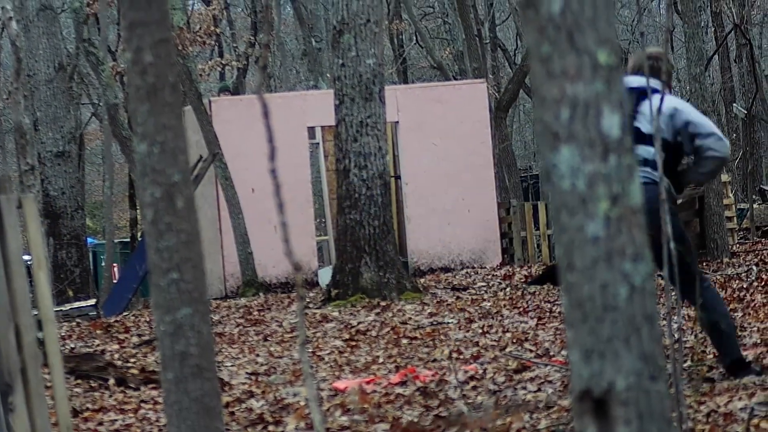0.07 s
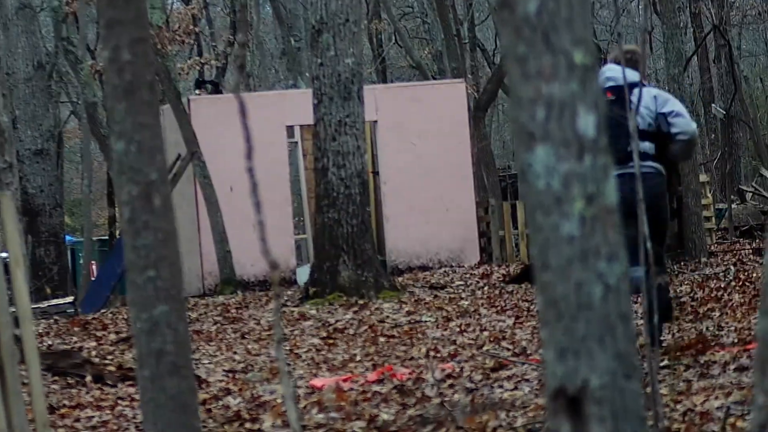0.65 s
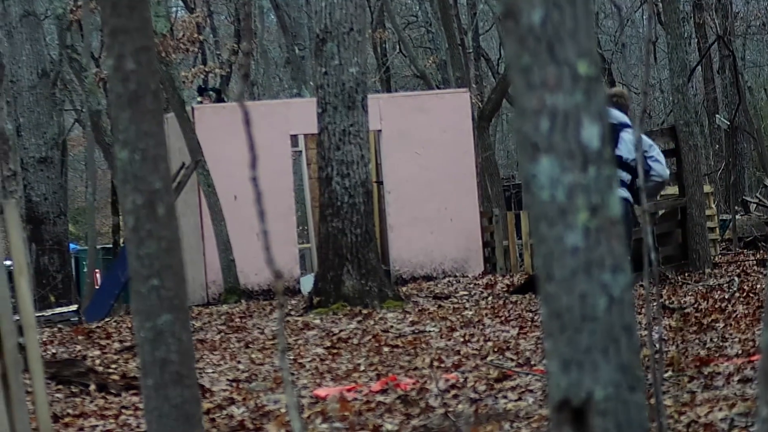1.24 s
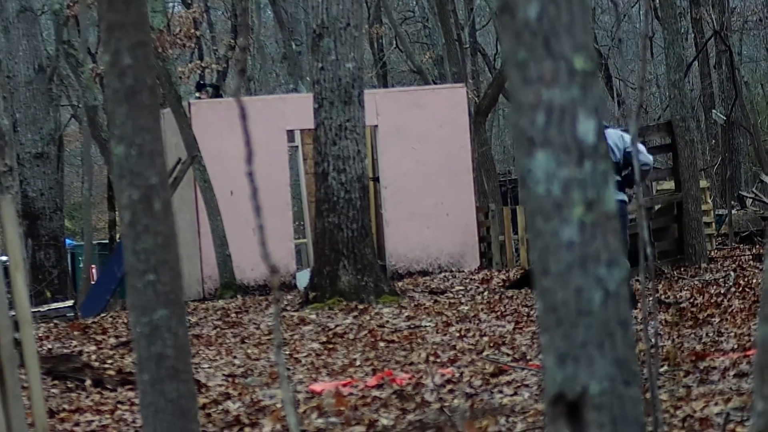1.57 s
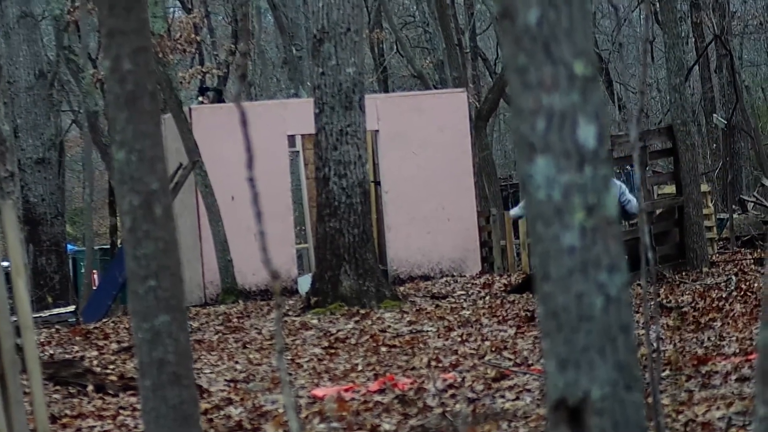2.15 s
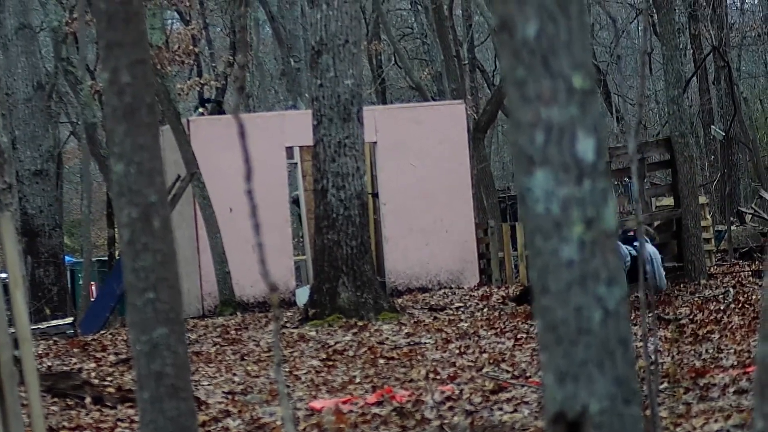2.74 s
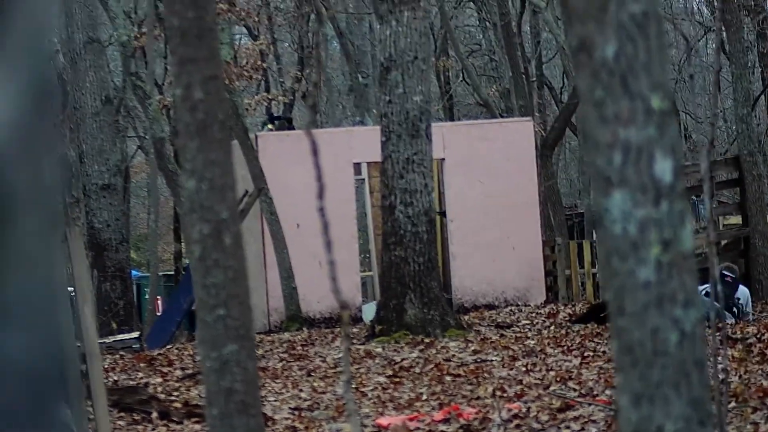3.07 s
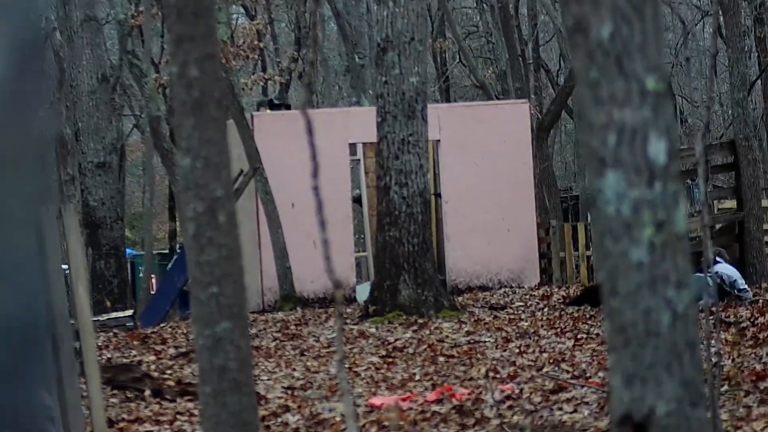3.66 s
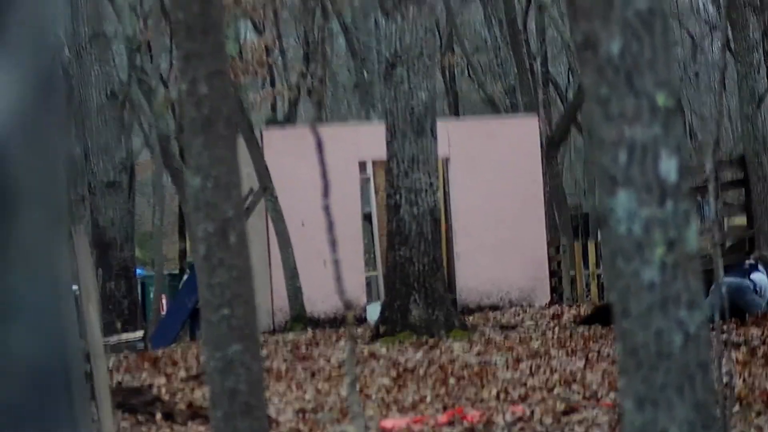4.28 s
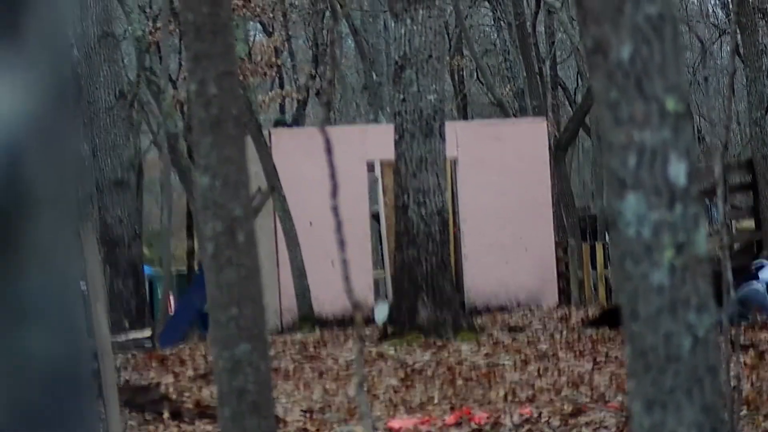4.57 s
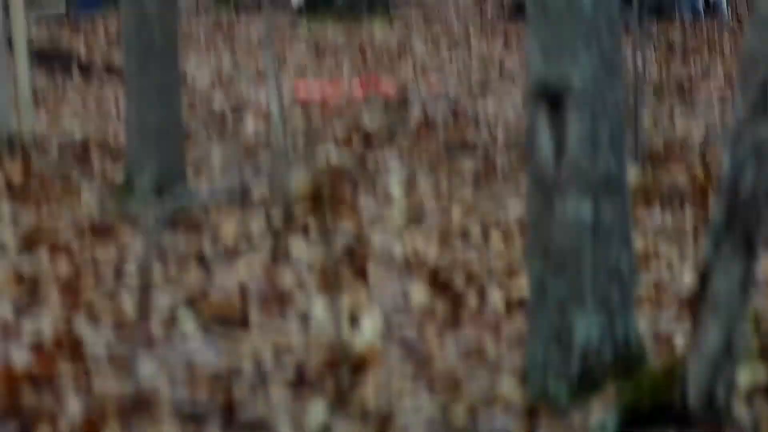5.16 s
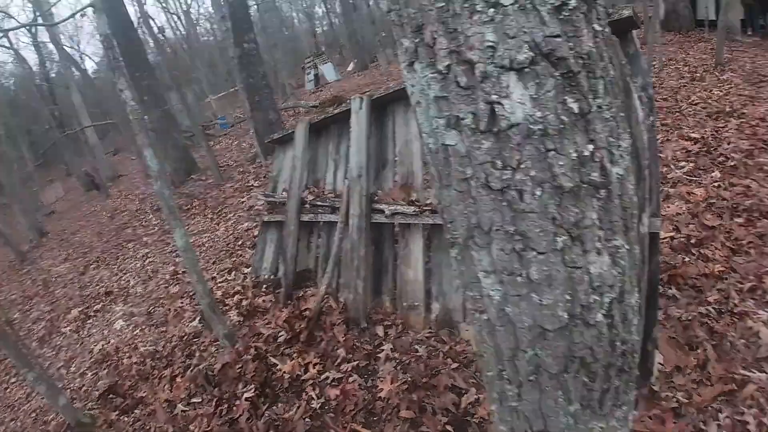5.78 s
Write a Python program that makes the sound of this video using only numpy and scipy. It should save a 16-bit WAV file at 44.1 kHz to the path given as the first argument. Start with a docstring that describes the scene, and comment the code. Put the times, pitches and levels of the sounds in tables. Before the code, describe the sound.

In a quiet wood, an electric airsoft rifle fires right at the microphone. Eight quick shots come first, then a brief pause and six more. Each is a short gear whirr ending in a hard clack and a hollow thud. The electric magazine winds and clicks faintly alongside, and the trigger springs back between shots. Afterwards hands bump the gun, a sleeve brushes it and a few faint ticks sound.

```python
"""A wood, with the microphone close on the body of an electric airsoft rifle: fourteen shots in two strings.
For each shot the motor whirrs up through the gears, the piston slams home and rings the gearbox,
the gun shudders and the trigger springs back. An electric magazine winds and clicks beside it.
Afterwards hands shift the gun, a sleeve brushes it and a few faint ticks sound in the still air."""
import sys
import numpy as np
from scipy import signal
from scipy.fft import rfft, irfft
from scipy.io import wavfile

SR = 44100
rng = np.random.default_rng(int(sys.argv[2]) if len(sys.argv) > 2 else 0)


def dump(signal):
    """Clip the signal to [-1, 1] and save it as 16-bit WAV at the path in sys.argv[1]."""
    limited = np.clip(np.atleast_2d(signal).T, -1, 1)
    pcm = np.round(limited * 32767).astype(np.int16)
    wavfile.write(sys.argv[1], SR, pcm)


N = 260895
TIME = np.arange(N) / SR


def from_db(db):
    return 10 ** (np.asarray(db) / 20)


def ramp(t, length):
    """From 0 at t = 0 up to 1 at t = length."""
    return np.clip(t / length, 0, 1)


def swell(middle_s, length_s):
    """A smooth rise and fall, as gain."""
    return np.sin(np.pi * ramp(TIME - middle_s + length_s / 2, length_s))


def add(track, start_s, sound):
    """Mix a sound into a track."""
    start = max(round(start_s * SR), 0)
    track[start:start + len(sound)] += sound[:max(N - start, 0)]


def flutter(rate_hz, size):
    """A smooth random wander with an RMS of 1."""
    lowpass = signal.butter(2, rate_hz, fs=SR, output="sos")
    wander = signal.sosfilt(lowpass, rng.standard_normal(size + SR // 10))[-size:]
    return wander / np.sqrt(np.mean(wander ** 2) + 1e-20)


def colour(x, spectrum, resonances=(), size=8192):
    """Minimum-phase filter of unit power: a broad slope lifted by ringing resonances."""
    hz = np.maximum(np.arange(size // 2 + 1) * SR / size, 1)
    knots, levels = np.transpose(spectrum)
    db = np.interp(np.log(hz), np.log(knots), levels)
    db += sum(lift / (1 + (2 * (hz - centre) / width) ** 2) for centre, width, lift in resonances)
    cepstrum = irfft(np.log(from_db(db)))[:size // 2]
    cepstrum[1:] *= 2
    response = irfft(np.exp(rfft(cepstrum, size)))
    return signal.oaconvolve(x, response / np.linalg.norm(response))[:N]


def bursts(contacts, rise_s):
    """Each contact (start_s, level_db, t60_s) is a dying cluster of tiny impacts."""
    out, t = np.zeros(N), TIME[:SR // 5]
    for s, db, t60 in contacts:
        envelope = from_db(db - 60 * t / t60) * (1 - np.exp(-t / rise_s))
        add(out, s, envelope * rng.choice([-1, 1], len(t)))
    return out


def mode(blows, hz, t60_s, rise_s):
    """One mode rung by soft blows (start_s, level_db)."""
    out, t = np.zeros(N), TIME[:SR]
    ring = np.sin(2 * np.pi * hz * t) * from_db(-60 * t / t60_s) * (1 - np.exp(-(t / rise_s) ** 2))
    for s, db in blows:
        add(out, s, from_db(db) * ring)
    return out


# The background of the wood: frequency_hz, level_db
AIR_COLOUR = [(240, -22), (400, -41), (558, -14), (660, -23), (1820, 7.5), (2510, -26.5), (4010, -4),
              (4740, 12.5), (5350, -11), (5860, 6), (15000, -68)]

def still_air():
    """A steady, faint hiss lies behind the gun."""
    return from_db(-66) * colour(rng.standard_normal(N), AIR_COLOUR)


# A faint whine before the first shot: pitch_ratio, level_db
FALLING_PARTIALS = [(1, -9), (1.41, -4.5), (1.569, -7.5)]

def falling_whine(start_hz=820, fall_hz_per_s=362, end_s=0.49, fade_s=0.13):
    """Three partials slide down together and fade."""
    phase = 2 * np.pi * np.cumsum(start_hz - fall_hz_per_s * TIME) / SR
    tones = sum(from_db(db) * np.sin(ratio * phase) for ratio, db in FALLING_PARTIALS)
    return from_db(-56.5) * ramp(end_s - TIME, fade_s) * tones


# Ticks after the last shot: start_s, level_db
TICKS = [(5.1424, -35), (5.1981, -25.5), (5.3147, -25), (5.4306, -32), (5.557, -27.5), (5.8024, -28.5),
         (5.881, -27.5)]
# Their thin tone: frequency_hz, level_db
TICK_COLOUR = [(1000, -28), (3500, -10.5), (4500, 4.5), (6100, 5), (7200, -3), (9500, -16), (11000, -34),
               (15000, -40)]

def faint_ticks():
    """Short, high ticks with a sharp onset."""
    ticks = bursts([(s, db, 0.018) for s, db in TICKS], rise_s=0.00015)
    return from_db(-9.5) * colour(ticks, TICK_COLOUR)


# Hands shifting the gun at the microphone: middle_s, length_s, sway_db, hum_db
SHIFTS = [(.05, 0.49, -51, -72.5), (4.93, 0.19, -40.5, -52), (5.08, 0.33, -44, -50.5),
          (5.3, 0.48, -43, -53), (5.46, 0.25, -56, -52), (5.61, .18, -41.5, -66), (5.82, 0.31, -52, -51.5)]
# The gun's deep sway and the hum of its body: frequency_hz, level_db
SWAY_COLOUR = [(15, -12), (29, 0.5), (40, -19.5), (54, 6), (66, -7.5), (90, -23), (150, -29), (400, -71)]
HUM_COLOUR = [(60, -31), (130, -15), (195, -15.5), (225, 2.5), (265, -12), (315, -4), (400, -33.5),
              (520, -38), (680, -24), (900, -38.5), (3000, -77)]

def handling():
    """The gun sways and hums as the hands shift it, and as they steady it after each shot."""
    steadying = [(s + 0.088, 0.29, -43.5, -55.5) for s, *_ in SHOTS]   # columns as in SHIFTS
    sway, hum = from_db(-61), from_db(-75)   # hands at rest
    for middle_s, length_s, sway_db, hum_db in SHIFTS + steadying:
        move = swell(middle_s, length_s)
        sway = np.maximum(sway, from_db(sway_db) * move)
        hum = np.maximum(hum, from_db(hum_db) * move)
    return (sway * colour(rng.standard_normal(N), SWAY_COLOUR)
            + hum * colour(rng.standard_normal(N), HUM_COLOUR))


# A sleeve on the gun, close up: middle_s, length_s, level_db, resonance_hz
RUBS = [(4.945, 0.15, -52, 2360), (5.532, 0.28, -63.5, 3300), (5.588, 0.063, -62, 1710)]
# The tone of a touch on the gun: frequency_hz, level_db
RUB_COLOUR = [(400, -4), (700, -3), (1300, 0), (1900, 8), (2400, -5.5), (3100, 2.5), (4000, -15),
              (9000, -38), (11000, -47.5)]

def sleeve(width_hz=700, lift_db=14):
    """Cloth brushes along the gun in swells of friction noise."""
    out = np.zeros(N)
    for middle_s, length_s, db, hz in RUBS:
        friction = colour(rng.standard_normal(N), RUB_COLOUR, [(hz, width_hz, lift_db)])
        out += from_db(db) * swell(middle_s, length_s) * friction
    return out


# Modes of the gun's body, right by the microphone: pitch_hz, t60_s, level_db
BODY_MODES = [(222.4, 0.095, -24), (313.1, .1, -34), (664.6, 0.047, -30.5)]

def body(blows, delay_s, rise_s, upper_db, spread_db):
    """Blows (start_s, level_db) ring the body; upper_db shifts all modes but the lowest."""
    out = np.zeros(N)
    for k, (hz, t60_s, mode_db) in enumerate(BODY_MODES):
        gain_db = mode_db + upper_db * (k > 0)
        arrivals = [(s + delay_s, db + gain_db + spread_db * rng.standard_normal()) for s, db in blows]
        out += mode(arrivals, hz, t60_s, rise_s)
    return out


# Hand knocks after the firing: start_s, thud_db, click_db
BUMPS = [(4.875, 3.5, -36.5), (5.03, 1.5, -37.5), (5.067, -1, -55), (5.715, -0.5, -52)]

def hand_bumps():
    """A hand bumps the gun: a click, and a thud in the body."""
    blows = [(s, db) for s, db, _ in BUMPS]
    thuds = body(blows, delay_s=0, rise_s=0.0055, upper_db=-0.5, spread_db=2.5)
    clicks = bursts([(s, db, 0.03) for s, _, db in BUMPS], rise_s=0.00066)
    return from_db(-7) * thuds + colour(clicks, RUB_COLOUR)


# The magazine's ratchet, close by: start_s, level_db
RATCHET = [(0.3767, -25.5), (0.631, -30.5), (1.277, -31), (1.514, -30.5), (2.1064, -25), (2.361, -25.5),
           (2.637, -25), (2.7646, -25.5), (2.89, -23.5), (3.018, -22), (3.6195, -24), (3.865, -26)]
# Tones of the ratchet and the winder: frequency_hz, level_db
RATCHET_COLOUR = [(100, -8), (450, -12), (700, -11), (1200, 7), (1700, -14), (2700, -3), (4000, -10),
                  (6000, -3.5), (8000, -21.5), (9800, -11.5), (11000, -36), (14000, -48), (15500, -46)]
WINDER_COLOUR = [(100, -13.5), (450, -15), (700, 5), (1200, 8), (1700, 2), (2700, -4.5), (4000, 0.5),
                 (6000, -6), (8000, -12), (9800, -8), (11000, -19.5), (14000, -35), (15500, -45)]
# Resonances of the magazine's box: centre_hz, width_hz, lift_db
MAGAZINE_BOX = [(1077, 140, 12.5), (1895, 240, 16.7), (2350, 96, 13), (3075, 110, 12.5), (3320, 690, 13.6),
                (5160, 1900, 13.4), (5880, 720, 8.2), (6200, 520, 7.3), (7700, 1200, 12),
                (8580, 1500, 14.1)]

def magazine(tighten_s=1.4, stop_s=3.97, fade_db_per_s=45, floor_db=-64.5):
    """The ratchet snaps over; the winder swells as its spring tightens, then stops, leaving a hiss."""
    snaps = [(s, db + 1.5, 0.011) for s, db in RATCHET]
    tails = [(s, db - 12, 0.05) for s, db in RATCHET]
    ratchet = bursts(snaps + tails, rise_s=0.00015)
    slack = 1 - ramp(TIME, tighten_s)
    winder_db = -53 - 4.5 * slack - fade_db_per_s * np.maximum(TIME - stop_s, 0)
    hiss = from_db(np.maximum(winder_db, floor_db) + 2 * flutter(120, N)) * rng.standard_normal(N)
    return colour(ratchet, RATCHET_COLOUR, MAGAZINE_BOX) + colour(hiss, WINDER_COLOUR, MAGAZINE_BOX)


# The trigger springing back: start_s, click_db, knock_db
TRIGGER_RETURNS = [(0.597, -30.5, 7), (0.934, -29.5, 7), (1.181, -27, 8.5), (1.465, -31.5, 5),
                   (1.739, -31.5, 3), (2.022, -34, 3), (2.319, -39, -8), (2.602, -25, 7.5),
                   (3.291, -32.5, 4), (3.557, -27, 6), (3.846, -34, -0.5), (4.081, -25.5, 4.5),
                   (4.399, -26.5, 7.5), (4.706, -26, 6.5)]
# Loose parts of the gun: start_s, level_db, t60_s
RATTLES = [(0.063, -38, 0.029), (0.074, -42.5, .04), (.24, -39.5, 0.038), (.25, -44, 0.043),
           (2.826, -38, 0.024), (4.14, -46, 0.025), (4.449, -38.5, 0.025), (4.476, -41, 0.024),
           (4.73, -44, 0.092), (4.781, -42.5, 0.039)]
# The tone of these small parts: frequency_hz, level_db
RATTLE_COLOUR = [(100, -25), (450, 2.5), (700, 3.5), (1200, 3), (1700, -3), (2700, 1.5), (4000, -8.5),
                 (6000, -8.5), (8000, -15), (9800, -7), (11000, -27), (14000, -29), (15500, -32)]

def trigger_and_rattles():
    """The trigger clicks back, bounces and knocks the body; loose parts rattle."""
    clicks = [(s, db, 0.035) for s, db, _ in TRIGGER_RETURNS]
    bounces = [(s + 0.022, db - 7, 0.03) for s, db, _ in TRIGGER_RETURNS]
    clatter = bursts(clicks + bounces + RATTLES, rise_s=0.00057)
    blows = [(s, db) for s, _, db in TRIGGER_RETURNS]
    knock = from_db(-2.5) * body(blows, delay_s=0.00304, rise_s=0.012, upper_db=6, spread_db=2.5)
    finger_cushion = signal.butter(3, 420, fs=SR, output="sos")
    return colour(clatter, RATTLE_COLOUR, GEARBOX_SHELL) + signal.sosfilt(finger_cushion, knock)


# The body's low growl, heard close: frequency_hz, level_db
GROWL_COLOUR = [(20, -39.5), (60, -16), (130, -11), (225, 1.5), (260, -5.5), (315, 5), (350, -7.5),
                (410, -30), (520, -25.5), (680, -20), (1500, -54.5)]

def springs(main_t60_s=0.27, trigger_t60_s=0.22):
    """The freed main spring and the returning trigger each leave a dying growl in the body."""
    main = [(s - LET_GO_LEAD_S, whirr_db - 36, main_t60_s) for s, _, whirr_db, *_ in SHOTS]
    trigger = [(s, knock_db - 48, trigger_t60_s) for s, _, knock_db in TRIGGER_RETURNS]
    return colour(bursts(main + trigger, rise_s=0.0017), GROWL_COLOUR)


def recoil():
    """The motor's kick, the spring's release and the slam shake the body; the whole gun bends and sways."""
    blows = [(s, shudder_db) for s, *_, shudder_db in SHOTS]
    kick = from_db(-28) * body(blows, delay_s=-0.099, rise_s=0.0067, upper_db=21.5, spread_db=1.5)
    spring = from_db(-7) * body(blows, delay_s=-0.0215, rise_s=0.003, upper_db=-4.5, spread_db=1)
    slam = from_db(1) * body(blows, delay_s=0.00444, rise_s=0.0031, upper_db=-7, spread_db=2)
    sway = from_db(-21.5) * mode(blows, hz=54.5, t60_s=0.55, rise_s=0.01)
    return kick + spring + slam - sway


# Ahead of the slam the motor starts, then the sector gear picks up the piston and lets it go.
MOTOR_LEAD_S, PICKUP_LEAD_S, LET_GO_LEAD_S = 0.123, 0.077, 0.023

def motor_cycle(start_hz=359.6, climb_hz_per_s=18500, top_hz=1527, sag_hz_per_s=1587, run_down_s=0.1):
    """The tooth-mesh rate climbs, levels off, sags as the spring tightens and runs down after the slam."""
    t = np.arange(-MOTOR_LEAD_S, 0.17, 1 / SR)   # the slam is at 0
    running_s = t + MOTOR_LEAD_S
    coasting_s = np.maximum(t + LET_GO_LEAD_S, 0)
    drawing_s = np.maximum(t + PICKUP_LEAD_S, 0) - coasting_s
    climb_hz = start_hz + climb_hz_per_s * running_s
    ceiling_hz = top_hz - sag_hz_per_s * drawing_s
    levelled_hz = (climb_hz ** -8 + ceiling_hz ** -8) ** (-1 / 8)   # a soft minimum
    mesh_hz = levelled_hz * np.exp(-np.maximum(t, 0) / run_down_s)
    loaded = ramp(drawing_s, 0.005) - ramp(coasting_s, 0.005)
    effort = ramp(running_s, 0.028) ** 2 * from_db(6.5 * loaded)   # louder while drawing the spring
    return t, mesh_hz, effort, coasting_s


# The whine of the gear teeth: mesh_multiple, level_db
WHINE_HARMONICS = [(1, -3), (2, -2), (3, -6.5), (4, -10)]
# Tones of the whine and the grinding: frequency_hz, level_db
WHINE_COLOUR = [(400, -19), (800, 1), (1100, -2), (1400, -6.5), (1900, -6), (2300, -9), (2550, 3.5),
                (2850, 4), (3150, -9.5), (4100, -18), (5000, -4), (6200, -0.5), (9000, -9.5)]
GRIND_COLOUR = [(100, -14), (450, -26), (700, -4), (1200, -10), (1700, -10), (2700, 3), (4000, -9),
                (6000, -7), (8000, -15.5), (9800, -10.5), (11000, -28), (14000, -27), (15500, -49)]
# Resonances where the whine sings out, the lower one in the gearbox shell: centre_hz, width_hz, lift_db
WHINE_RESONANCES = [(1626, 110, 5.5), (2784, 170, 3.5)]

def gears(wobble=0.016, roughness=0.44, tooth_depth=0.4, turn_depth=0.07, grain_db=1.5):
    """The motor works against the spring: teeth whine and chop the grinding noise, and the body growls."""
    grind, whine, growl = np.zeros((3, N))
    t, mesh_hz, effort, coasting_s = motor_cycle()
    size = len(t)
    noise_fade, whine_fade = from_db(-158 * coasting_s), from_db(-1499 * coasting_s)
    for slam_s, _, whirr_db, speed, _ in SHOTS:
        tooth_phase = 2 * np.pi * np.cumsum(mesh_hz * speed * (1 + wobble * flutter(240, size))) / SR
        pinion_turn = 1 + turn_depth * np.sin(tooth_phase / 10)   # ten teeth to a turn
        load = effort * from_db(whirr_db + grain_db * flutter(600, size)) * pinion_turn
        tones = sum(from_db(db) * np.sin(k * tooth_phase) * (1 + roughness * flutter(190, size))
                    for k, db in WHINE_HARMONICS)
        chop = 1 + tooth_depth * np.cos(tooth_phase)
        start_s = slam_s - MOTOR_LEAD_S
        add(grind, start_s, load * noise_fade * chop * rng.standard_normal(size))
        add(whine, start_s, load * whine_fade * tones)
        add(growl, start_s, load * noise_fade * rng.standard_normal(size))
    return (from_db(-33.5) * colour(grind, GRIND_COLOUR, GEARBOX_SHELL)
            + from_db(-40.5) * colour(whine, WHINE_COLOUR, WHINE_RESONANCES)
            + from_db(-54) * colour(growl, GROWL_COLOUR))


# The shots, right at the microphone: slam_s, slam_db, whirr_db, speed_ratio, shudder_db
SHOTS = [(0.53, 1.5, 3, 1.14, 2.5), (0.8623, 0.7, -0.5, 0.95, 0), (1.107, 0.7, -0.5, 1, -0.5),
         (1.394, 0.1, -1.6, 0.99, 0.5), (1.6686, 1.4, -2, 0.99, -2), (1.9516, 0.5, -2.5, 1, .5),
         (2.2522, 1.2, -2, 0.99, -1), (2.5192, 0.5, -2.1, 0.96, 0), (3.2184, 1, 0.5, 1, 2),
         (3.4727, 1, -1, 1.02, 2), (3.7712, 0.6, -0.8, 1.04, -2), (3.999, -0.5, -1.5, 0.985, 0),
         (4.316, 1.5, -1.4, 1, 0), (4.622, 1, -1, 1.02, 1)]
# In each shot the sector gear picks up and lets go, the piston runs, hits and rebounds,
# and the gears roll back: from_slam_s, clack_db, knock_db, t60_s
CONTACTS = [(-.076, -28, -45, 0.028), (-.024, -23, -47, 0.05), (-.0135, -19, -33.5, 0.023),
            (-.0118, -16.5, -35, 0.012), (-.0078, -9.5, -19.5, 0.019), (-.0007, -6, -36.5, 0.011),
            (.002, -20.5, -40, 0.037), (0.0232, -32, -44, 0.024), (.029, -37.5, -45, 0.1),
            (.068, -49, -48.5, 0.091)]
# Tones of the hard clack and the hollow knock: frequency_hz, level_db
CLACK_COLOUR = [(100, -0.5), (450, -15.5), (700, -4), (1200, 0.5), (1700, 1), (2700, 0.5), (4000, -4),
                (6000, -1), (8000, -4.5), (9800, 0.5), (11000, -14), (14000, -18), (15500, -22)]
KNOCK_COLOUR = [(60, -41), (200, -19), (450, -15), (670, -4.5), (800, -1.5), (1000, 4.5), (1300, -10),
                (2000, -11.5), (5000, -48.5)]
# Resonances of the gearbox shell: centre_hz, width_hz, lift_db
GEARBOX_SHELL = [(814, 48, 4.5), (1010, 230, 10.5), (1380, 85, 7), (1627, 111, 12.5), (1910, 378, 14.5),
                 (2262, 165, 9), (2883, 610, 8.5), (3220, 350, 14), (3245, 130, -2.5), (3650, 330, 14),
                 (3957, 243, 10.5), (4440, 220, 6), (4854, 760, 14), (5085, 1250, 6), (6136, 780, 17.5),
                 (7240, 550, 13.5), (8100, 980, 11.5), (8720, 2850, 6)]

def piston(scatter_db=1.1):
    """A quick run of contacts around the slam rings the gearbox shell and the hollow receiver."""
    clacks, knocks = [], []
    for slam_s, slam_db, *_ in SHOTS:
        for from_slam_s, clack_db, knock_db, t60_s in CONTACTS:
            hit_db = slam_db + scatter_db * rng.standard_normal()
            clacks.append((slam_s + from_slam_s, hit_db + clack_db, t60_s))
            knocks.append((slam_s + from_slam_s, hit_db + knock_db, t60_s))
    return (colour(bursts(clacks, rise_s=0.00039), CLACK_COLOUR, GEARBOX_SHELL)
            + colour(bursts(knocks, rise_s=0.00072), KNOCK_COLOUR))


def scene():
    """The rifle close up and the wood behind it, all in the centre."""
    rifle = gears() + piston() + springs() + recoil() + trigger_and_rattles() + magazine()
    hands = handling() + hand_bumps() + sleeve()
    background = falling_whine() + faint_ticks() + still_air()
    mono = rifle + hands + background
    return np.array([mono, mono])


def record(dry, cutoff_hz=15750):
    """The microphone's signal loses its highest treble to a steep low-pass."""
    return signal.sosfilt(signal.cheby2(14, 60, cutoff_hz, fs=SR, output="sos"), dry)


dry = scene()
out = record(dry)
dump(out)
```